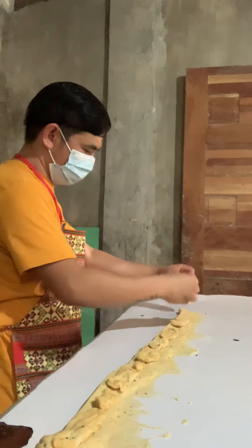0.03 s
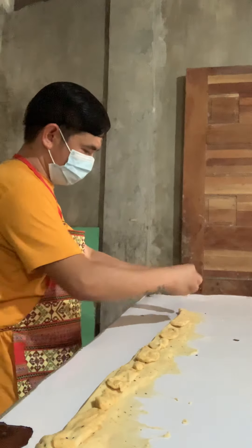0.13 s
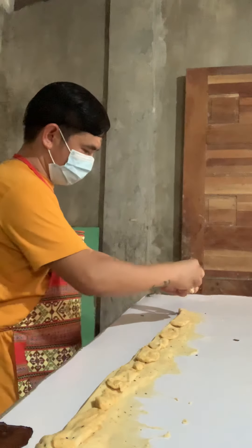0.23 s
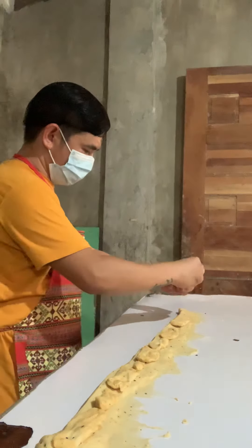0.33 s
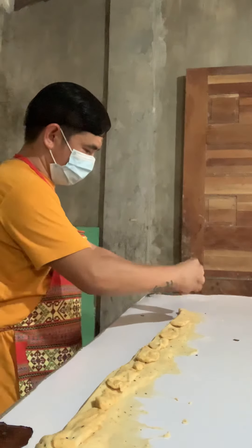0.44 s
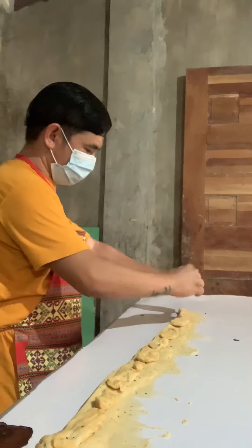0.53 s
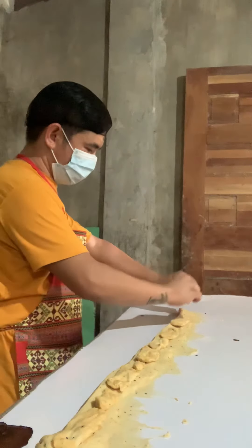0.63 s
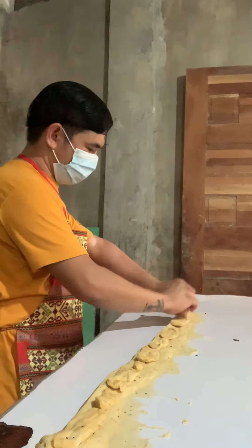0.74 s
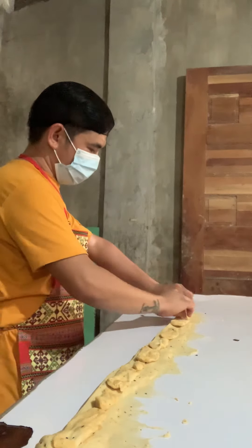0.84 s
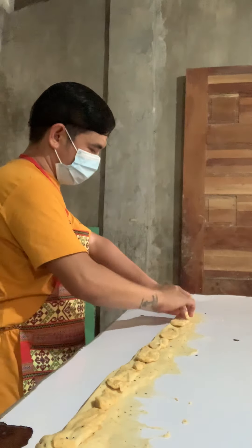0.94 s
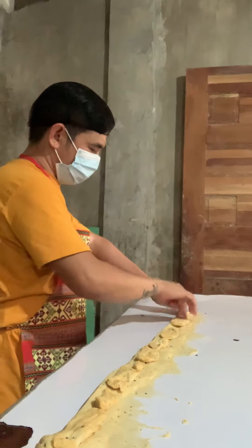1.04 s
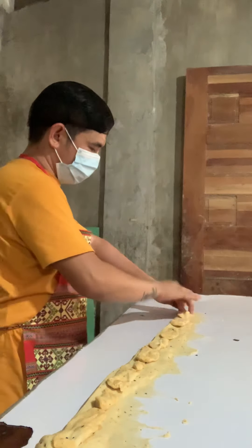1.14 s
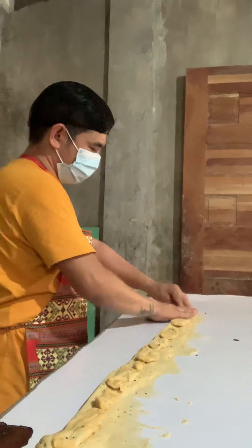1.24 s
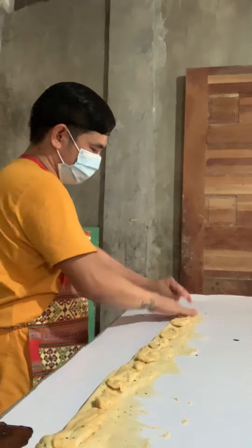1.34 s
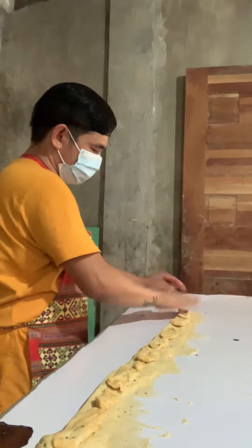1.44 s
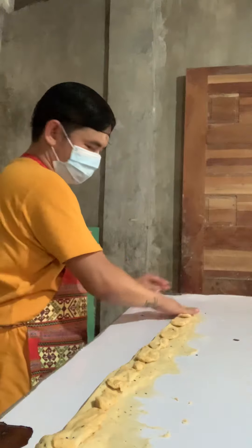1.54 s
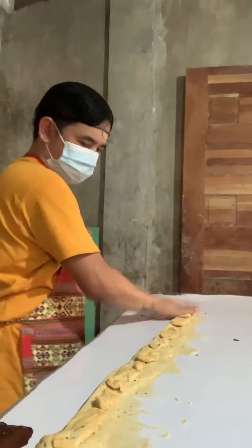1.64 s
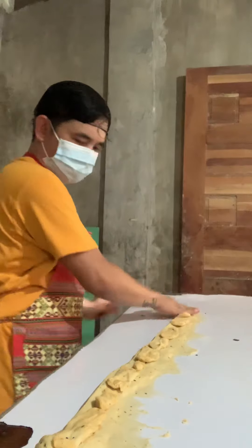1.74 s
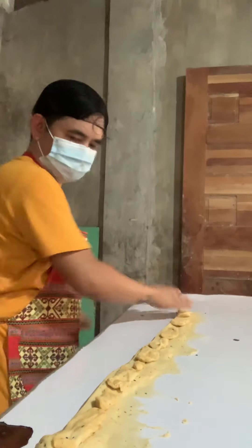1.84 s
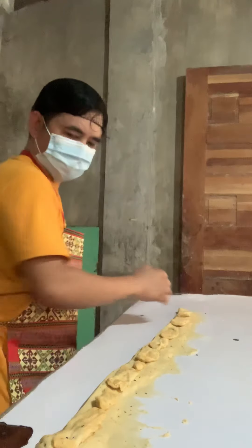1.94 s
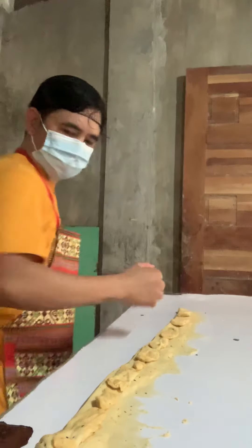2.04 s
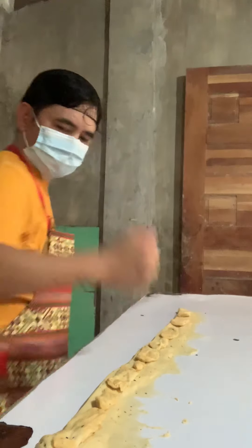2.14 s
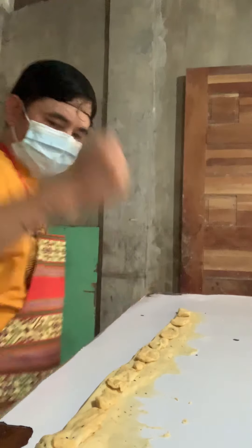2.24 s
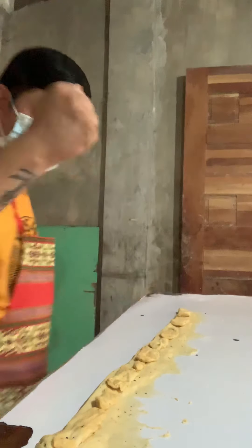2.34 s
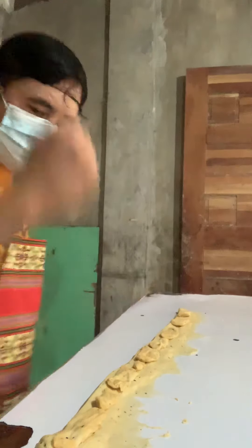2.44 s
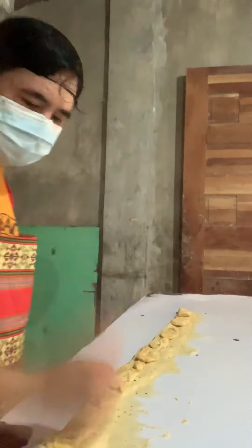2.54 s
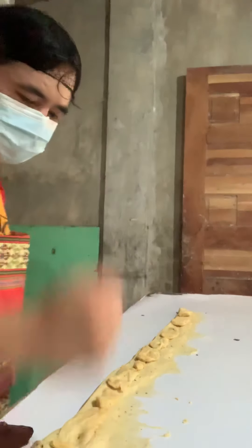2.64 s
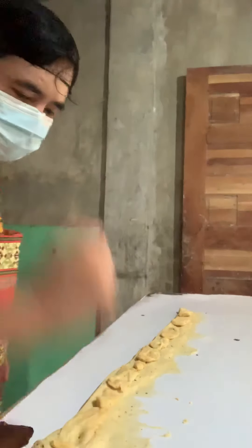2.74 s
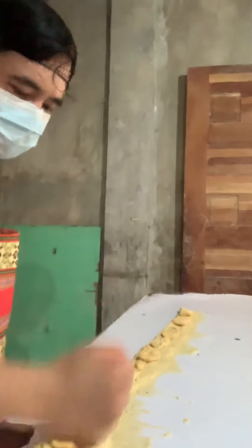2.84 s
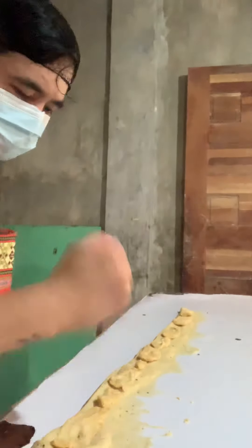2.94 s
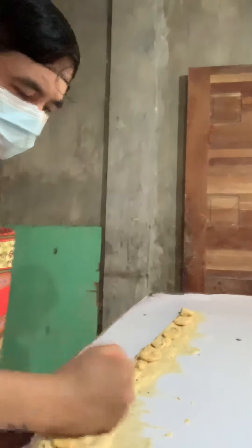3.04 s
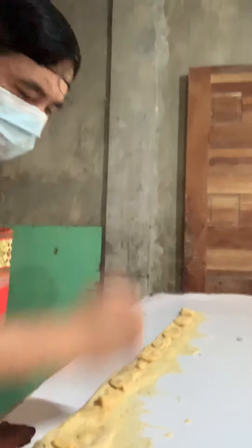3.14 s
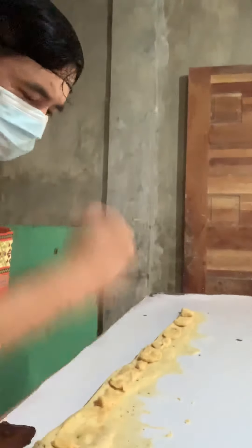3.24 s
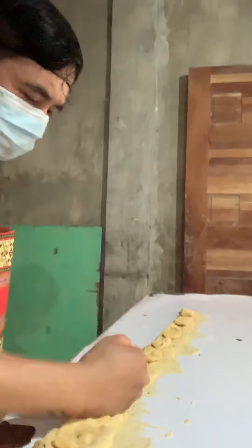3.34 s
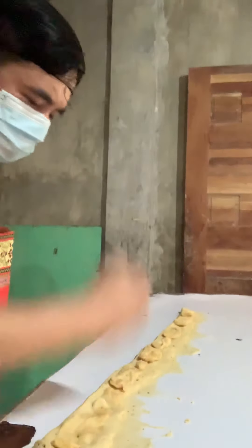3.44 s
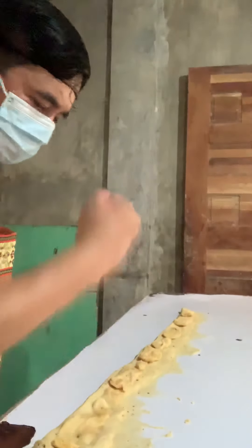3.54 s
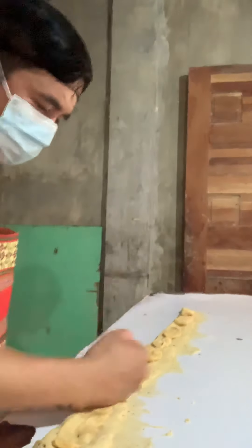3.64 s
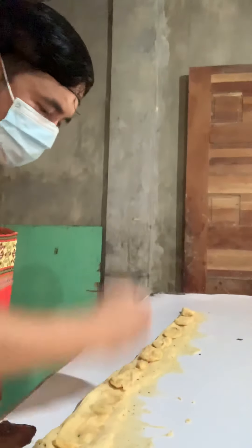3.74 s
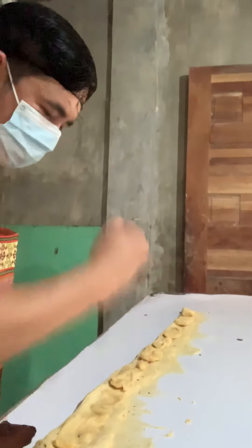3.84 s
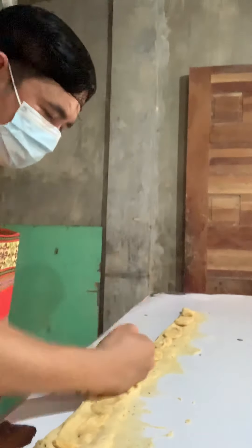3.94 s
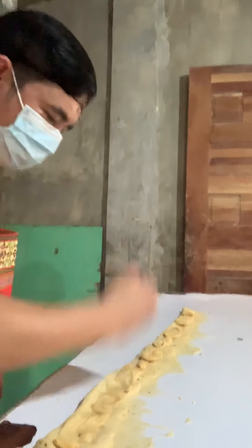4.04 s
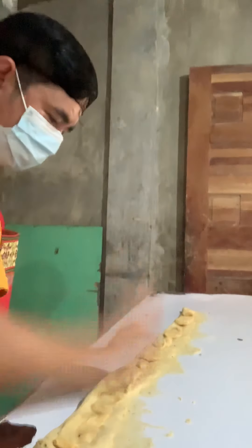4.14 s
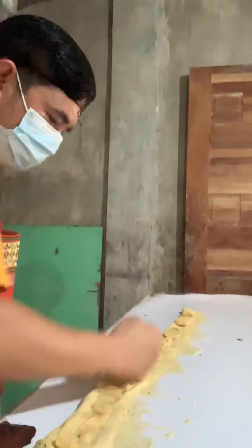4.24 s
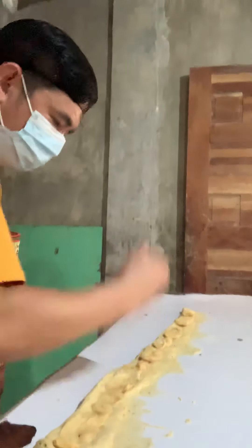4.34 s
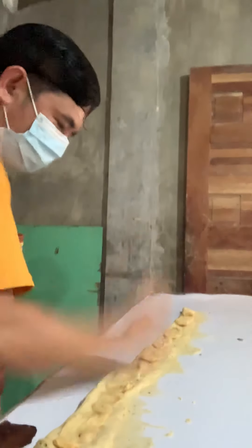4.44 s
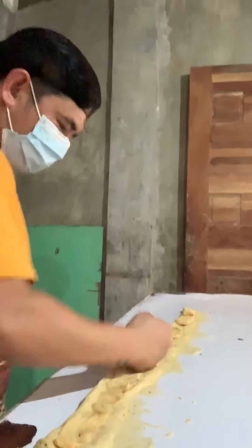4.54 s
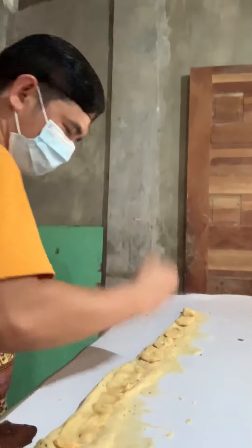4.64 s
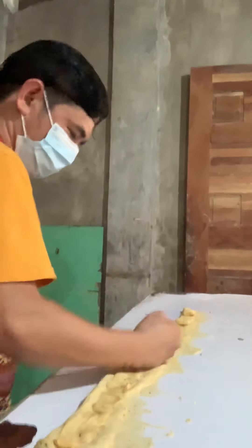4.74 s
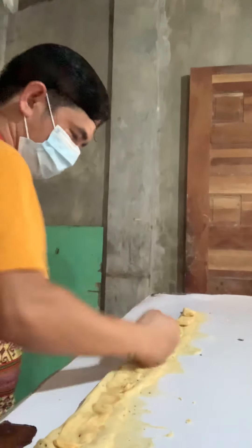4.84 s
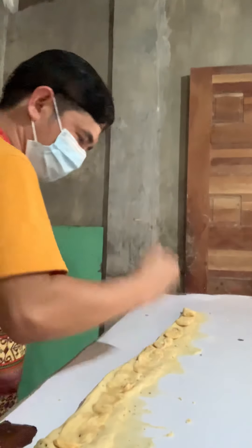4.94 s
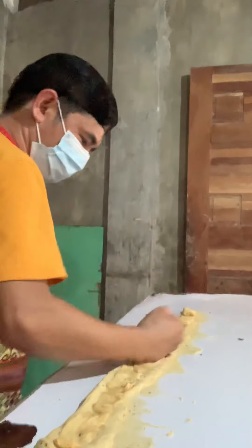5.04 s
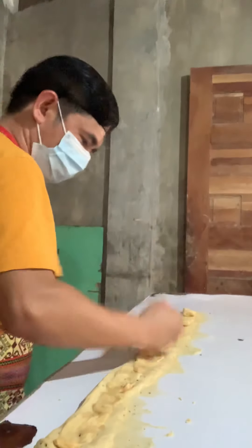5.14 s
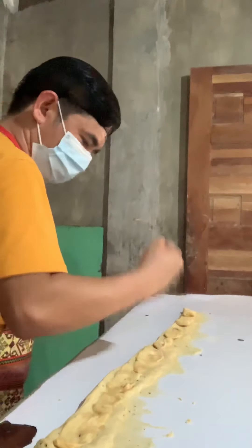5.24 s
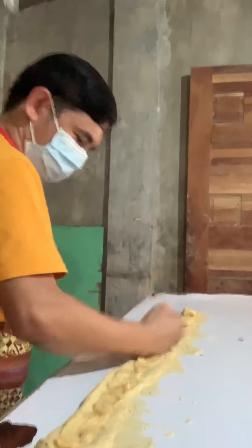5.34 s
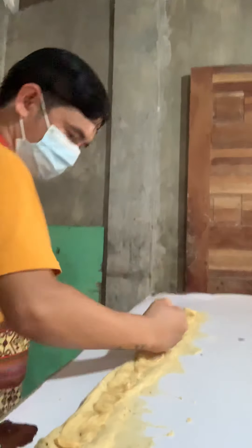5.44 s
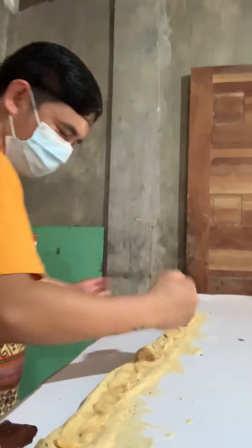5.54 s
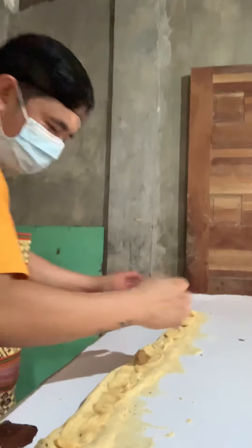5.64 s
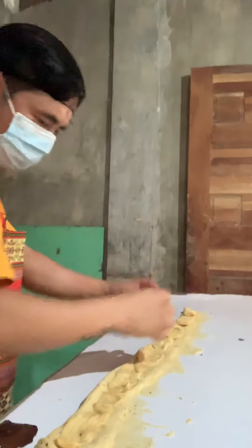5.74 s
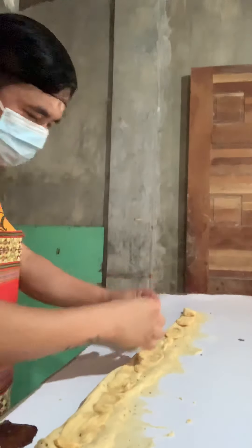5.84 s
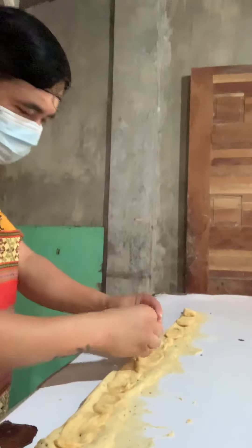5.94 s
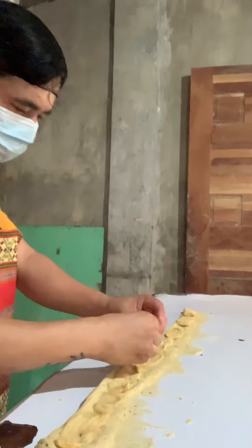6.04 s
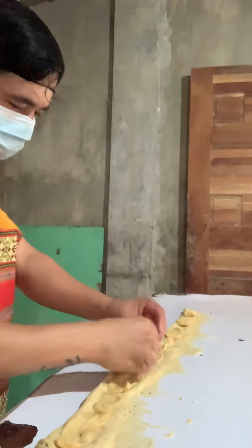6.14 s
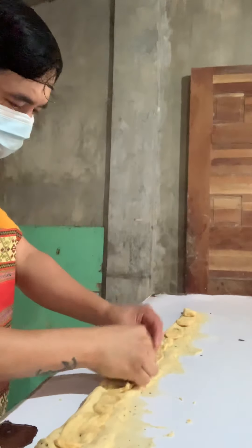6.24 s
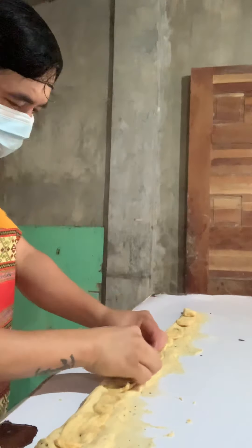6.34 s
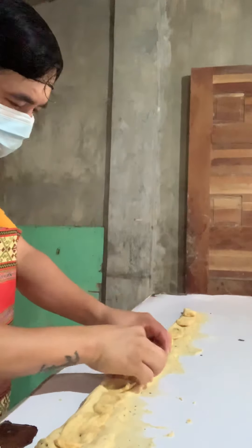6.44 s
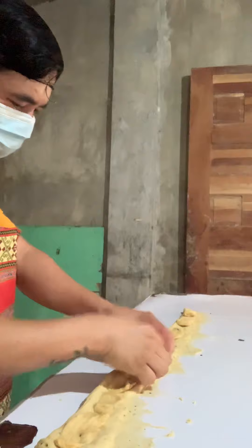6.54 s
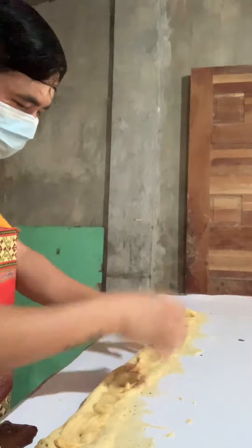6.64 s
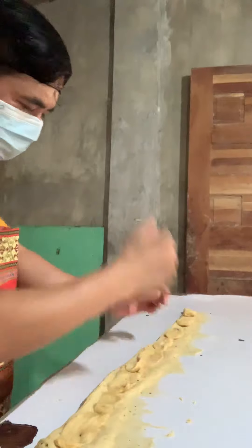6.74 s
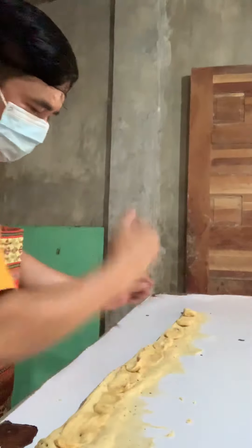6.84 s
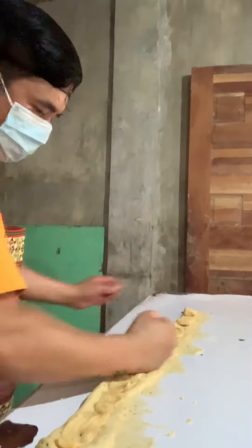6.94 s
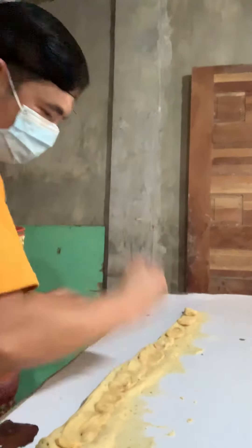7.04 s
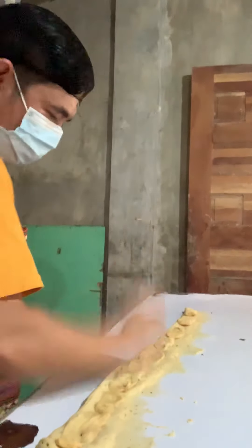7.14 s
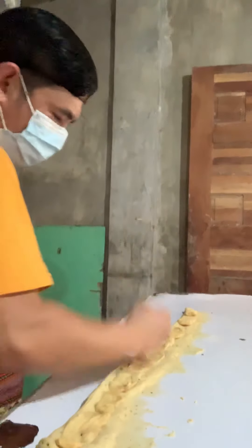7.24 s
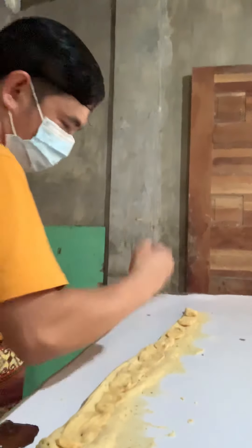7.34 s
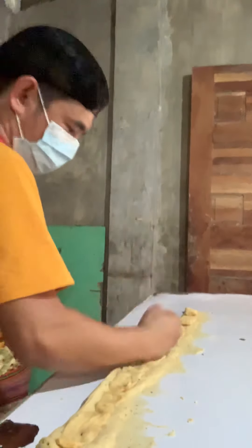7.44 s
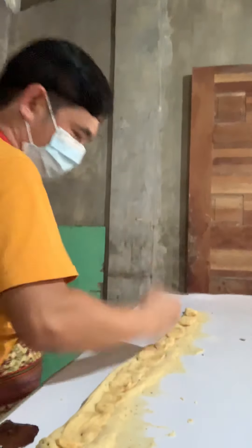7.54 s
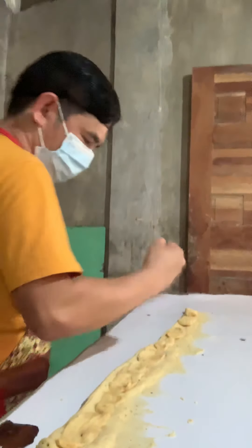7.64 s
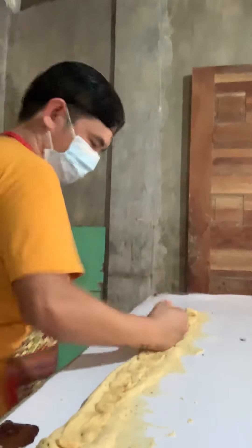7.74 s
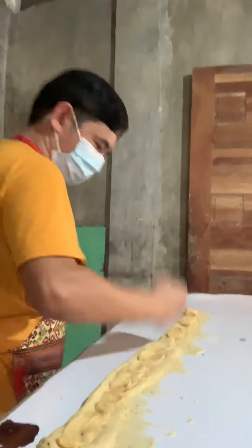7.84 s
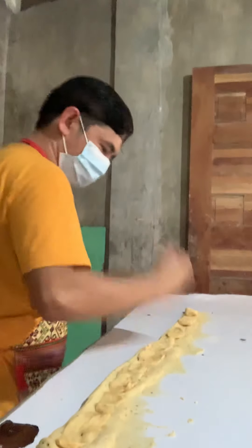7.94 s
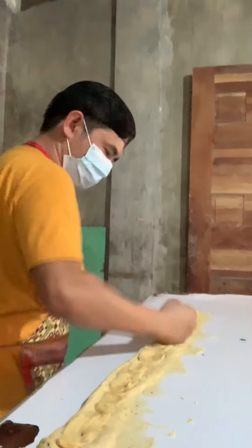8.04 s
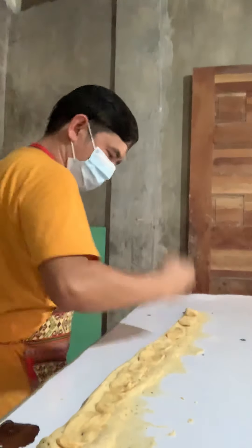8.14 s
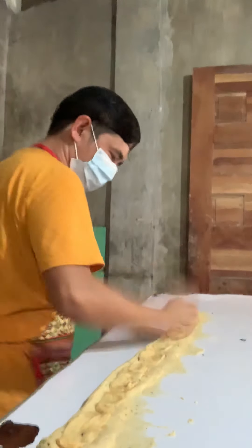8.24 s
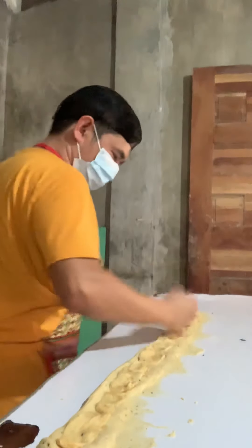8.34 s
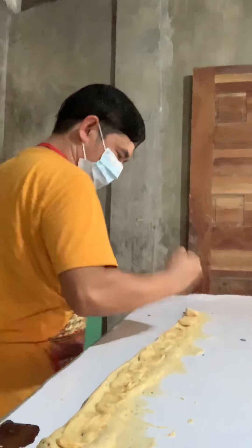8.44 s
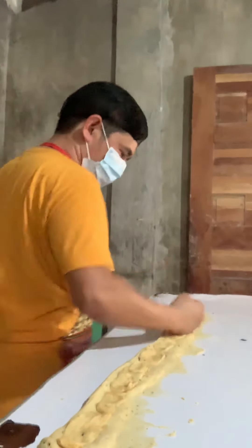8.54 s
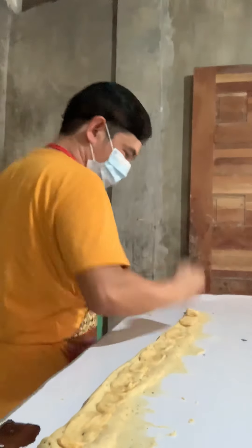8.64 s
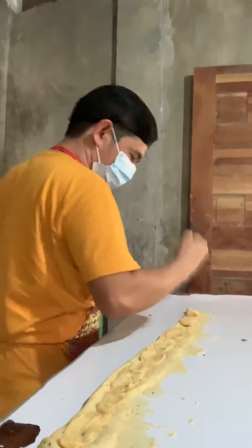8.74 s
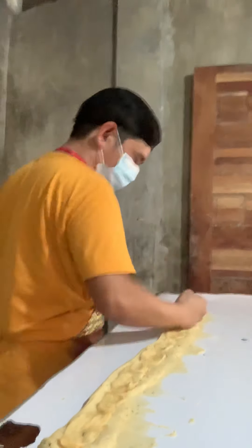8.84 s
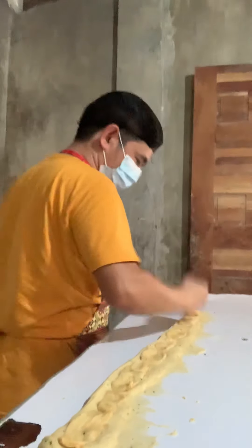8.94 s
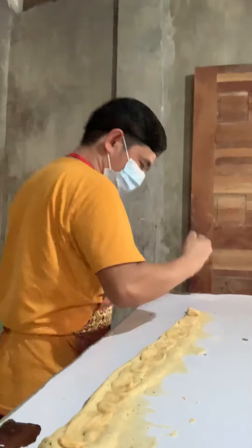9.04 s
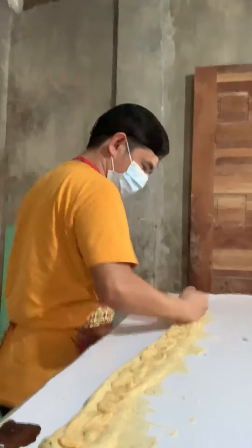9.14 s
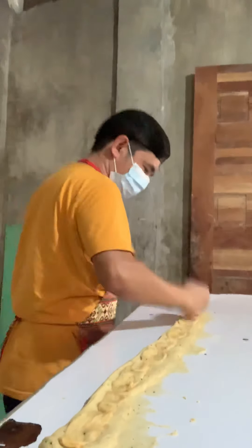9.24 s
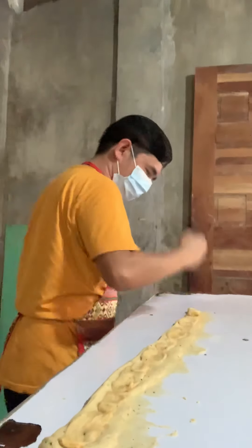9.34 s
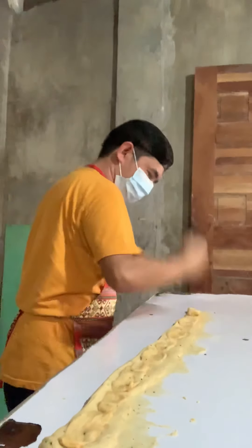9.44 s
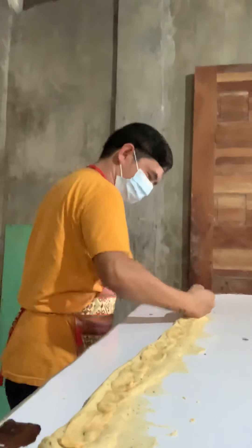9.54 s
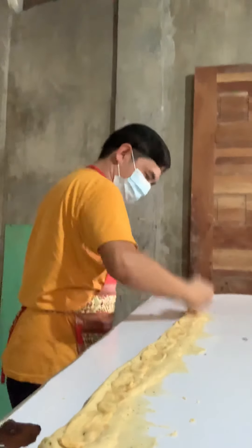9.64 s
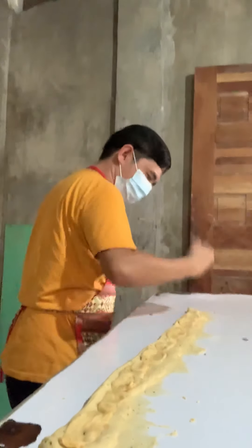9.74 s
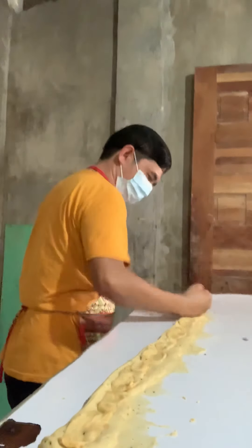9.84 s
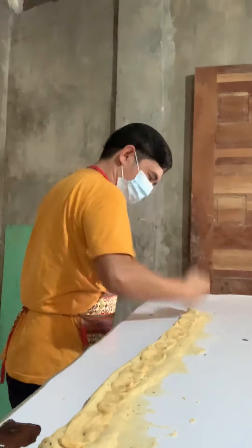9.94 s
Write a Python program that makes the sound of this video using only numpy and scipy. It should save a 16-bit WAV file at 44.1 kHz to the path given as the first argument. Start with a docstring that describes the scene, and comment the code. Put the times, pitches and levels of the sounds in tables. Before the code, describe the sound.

Close by, a fist pounds dough on a heavy table with a loose top. After a distant slap or two and soft palm pats, a run of about eleven deep thuds begins, each followed by a quick woody clack. It pauses with little but machine hum and faint pats, then a second run lasts to the end. Concrete-walled bakery, close stereo microphone.

```python
"""A fist pounds dough on a heavy table in two runs: modal booms, knocks and noise bursts per blow.
The loose top drops back and bounces; a palm pats the dough at softer moments.
Further off dough is slapped down: blurred noise, bench modes, a hollow pop, a skid and a hiss.
Behind: a motor of wavering harmonics and a rush of coloured noise, in a concrete-walled bakery."""
import sys
import numpy as np
from scipy import signal
from scipy.fft import rfft, irfft
from scipy.io import wavfile
from scipy.ndimage import uniform_filter1d, minimum_filter1d

SR = 44100
rng = np.random.default_rng(int(sys.argv[2]) if len(sys.argv) > 2 else 0)


def inscribe(sig):
    """Save sig as 16-bit PCM at rate SR to the path in sys.argv[1].

    A 1-D sig is mono; a 2-D sig holds one channel per row.
    Samples are clipped to [-1, 1] before scaling.
    """
    pcm = np.round(np.clip(np.atleast_2d(sig).T, -1, 1) * 32767)
    wavfile.write(sys.argv[1], SR, pcm.astype(np.int16))


N = 440559

# Event and source levels are relative: each source adds its own offset. Mode pitches are nominal.
# Spectra list hz, density_db (relative, per Hz).

# air rush spectrum: hz, density_db
AIR_SPECTRUM = [(25, -7), (46, -3.5), (68, -5.5), (100, -8), (160, -12.5), (250, -17.5), (380, -13.5),
                (620, -17.5), (1130, -15), (2500, -20.5), (6000, -29), (7500, -36), (10500, -41.5),
                (12500, -31), (16000, -38)]
# motor tones: multiple_of_speed, unloaded_rms_db, full_load_gain_db
MOTOR_TONES = [(2, -58, 13), (3, -57.5, -2.5), (4, -48.5, -15.5), (5, -54.5, -4.5), (6, -59.5, -8),
               (7, -58.5, -0.5), (10, -65, 1.5), (11, -58, -10), (12, -61, 0.5), (15, -57, -14),
               (16, -59.5, -9.5), (17, -57.5, -11), (21, -62, -8)]
# motor load breakpoints: time_s, load_0_to_1
MOTOR_LOAD = [(0, 0.26), (.36, 0.03), (.48, 0.73), (1.25, 0.9), (1.5, 0.22), (5.5, 0.7), (6.0, 1),
              (6.9, 0.66)]

# far slaps: start_s, body_db, pop_db, hiss_db, swell_s
FAR_SLAPS = [(0.645, -13, -18, -22, 0.0075), (1.895, -36, -39, -29, 0.018), (2.095, -14, -16.5, -23, 0.018),
             (2.178, -23.5, -25.5, -30.5, 0.011), (2.46, -34.5, -47, -30.5, 0.01),
             (2.731, -32, -49, -26.5, 0.047), (3.02, -31, -45, -29.5, 0.025),
             (3.299, -29.5, -44, -30, 0.05), (3.588, -30, -37, -31, 0.0056), (3.88, -26, -32, -28.5, 0.014),
             (4.185, -26, -49, -31, 0.053), (6.09, -36, -29, -33.5, 0.016),
             (6.36, -38.5, -37.5, -42, 0.027), (7.275, -18, -17.5, -37.5, 0.043),
             (7.57, -15.5, -19.5, -35, 0.072), (7.85, -17.5, -22, -37, 0.047),
             (8.08, -22, -23.5, -42, 0.075), (8.35, -14.5, -14, -29, 0.03),
             (8.645, -21.5, -20, -30.5, 0.018), (8.92, -23, -24, -28.5, 0.055),
             (9.259, -37, -36.5, -29, 0.056), (9.55, -35.5, -36, -28, 0.019)]
# slap body spectrum: hz, density_db
SLAP_BODY_SPECTRUM = [(30, -22.5), (55, -6), (80, 2), (130, -1), (200, -5.5), (400, -6), (650, -1.5),
                      (850, -5), (1080, -5.5), (1500, -9), (2500, -16.5), (5000, -33.5), (9000, -65)]
# floury hiss spectrum: hz, density_db
HISS_SPECTRUM = [(100, -22), (500, 10.5), (1500, 4.5), (3000, 3.5), (5800, 0), (8000, -10.5), (10500, -15),
                 (13000, -3), (16000, -10.5)]
# trapped-air spectrum: multiple_of_pop_pitch, density_db
POCKET_SPECTRUM = [(.25, -28), (.46, -7), (.66, -6.5), (.77, 1.5), (.89, -5.5), (1.02, 3), (1.16, -6),
                   (1.7, -10), (4, -59.5)]
# far bench modes: pitch_hz, level_db
BENCH_MODES = [(335, -5.5), (394, -3), (452, -5), (520, 0.5), (585, -0.5), (725, -4), (868, -11)]

# room decay: hz, t60_s
ROOM_DECAY = [(100, 0.89), (400, 0.85), (2000, 0.88), (6000, 0.82), (15000, 0.56)]
# spectrum of the wall tail: hz, density_db
WALL_SPECTRUM = [(60, -6.5), (150, -3.5), (400, 2.5), (850, -7), (1500, 6.5), (5000, 2), (15000, -11.5)]
# likeness of the two microphone ports: hz, likeness_0_to_1
PORT_LIKENESS = [(40, 1), (120, 1), (300, 0.88), (700, 0.62), (1400, 0.54), (3000, 0.13), (7000, 1),
                 (10000, 1), (14000, 0.11)]
# phase between the ports: hz, left_lead_rad
PORT_LEAD = [(30, 0), (150, 0), (800, -.5), (1400, -.8), (2200, -2.1), (4200, -4.2), (5700, -4.3),
             (7000, -3.3), (11000, -3.1), (12600, -1.7), (14800, -.2)]
# stereo width: hz, side_gain_db
SIDE_GAIN = [(30, -20), (80, 11), (150, 1.5), (300, 1), (700, 2), (2000, -0.5), (4000, -1.5), (7000, 1.5),
             (9500, 11), (12000, 2), (16000, -6.5)]

# palm pats: start_s, thump_db, knock_db
PALM_PATS = [(1.283, -26, -37.5), (1.321, -30, -38), (1.539, -16, -26), (1.722, -26, -38),
             (2.756, -35, -24), (5.777, -39, -45)]
# top under a flat palm: hz, density_db
PALM_SPECTRUM = [(60, 4), (200, -2.5), (400, -4), (700, -6), (1000, -16), (3000, -38), (9000, -62)]

# fist blows: start_s, thump_db, knock_db, smack_db, skin_lead_s, spot_hz, knock_tilt_db_per_octave, clap_db
FIST_BLOWS = [(2.618, -5.5, -9.5, -31, 0.014, 813, 1, -35), (2.862, -4, -10, -18.5, 0.015, 524, 2.5, -35),
              (3.089, -1, -6, -35, 0.013, 800, -0.5, -25.5), (3.368, -2, -6, -33, 0.013, 720, 1, -27),
              (3.683, -4, -9.5, -30, 0.015, 727, -0.5, -28), (3.969, -3.5, -11, -35, 0.016, 695, -2.5, -26),
              (4.225, -5, -9, -32, 0.014, 800, -1, -29), (4.527, -5, -11, -31, 0.014, 585, 1, -36),
              (4.802, -4.5, -7.5, -37, 0.014, 682, 0, -26.5), (5.069, -7, -11, -30.5, 0.014, 810, -2, -46),
              (5.369, -7, -10.5, -36, 0.011, 748, -1.5, -45),
              (6.943, -1.5, -3.5, -29, 0.014, 812, 0.5, -23.5),
              (7.193, -2.5, -6.5, -34, 0.012, 720, 0, -24), (7.473, -3.5, -6, -29, 0.014, 599, -1.5, -31),
              (7.748, -3, -9.5, -29.5, 0.017, 493, 1.5, -30),
              (8.024, -3.5, -8, -35, 0.011, 680, 0.5, -25.5), (8.289, -5.5, -8, -39, 0.015, 489, 0, -40),
              (8.533, -4.5, -8, -35, 0.0096, 598, 0.5, -31), (8.847, -4, -6, -30.5, 0.018, 900, -1.5, -24),
              (9.17, -5.5, -8.5, -31.5, 0.0098, 658, 0, -26), (9.53, -7, -6.5, -37, 0.015, 765, 0.5, -30),
              (9.875, -9.5, -8, -29, 0.019, 638, 1.5, -26)]
# loose top dropping on its frame: start_s, knock_db, click_db
TOP_DROPS = [(2.633, -14, -44), (2.645, -12, -33), (2.657, -22, -45), (2.677, -25.5, -51), (2.876, -7, -38),
             (2.889, -8, -36), (2.904, -21, -41), (3.107, -10.5, -33), (3.119, -6, -30), (3.132, -25, -46),
             (3.383, -13.5, -49), (3.397, -5.5, -25.5), (3.415, -23.5, -49), (3.697, -11.5, -37),
             (3.713, -6.5, -27), (3.723, -13.5, -39), (3.984, -13, -46), (3.997, -9.5, -34),
             (4.007, -24, -52), (4.235, -13.5, -44), (4.247, -8, -49), (4.538, -7.5, -38),
             (4.556, -12.5, -39), (4.814, -14, -44), (4.828, -9.5, -33.5), (5.091, -10, -43),
             (5.123, -17.5, -58), (5.386, -13.5, -37), (5.401, -19, -41), (6.954, -8.5, -36),
             (6.972, -8.5, -36), (7.0, -21, -39), (7.205, -9, -41), (7.22, -10.5, -45), (7.249, -15, -43),
             (7.497, -9.5, -35), (7.773, -8, -33), (8.051, -7.5, -31), (8.314, -13.5, -41),
             (8.556, -12.5, -31), (8.867, -12.5, -42), (8.881, -11.5, -36.5), (8.902, -21, -43),
             (9.194, -6.5, -34), (9.551, -6, -28), (9.896, -7.5, -25.5), (9.91, -12, -34)]
# table modes: pitch_hz, level_db, t60_s
TABLE_MODES = [(33.1, -15, 0.97), (48.3, -22, 0.3), (63.6, -9, 0.22), (85.3, -9.5, 0.21),
               (105.3, -21.5, 0.49), (121.3, -19.5, 0.73), (143, -23.5, 0.52), (175.4, -23.5, 0.47),
               (202, -35, 0.32), (232, -31.5, 0.6)]
# loose-top modes: pitch_hz, level_db
BOARD_MODES = [(205, -0.5), (272, -7), (338, -2.5), (386, -7.5), (484, -4), (553, 0.5), (618, -4.5),
               (660, 4), (745, -8.5), (778, 4), (836, 0.5), (895, -0.5), (1010, -4.5)]
# dull thud of top on frame: hz, density_db
THUD_SPECTRUM = [(60, -34), (150, 4), (250, 1.5), (430, -9.5), (520, 0.5), (660, -6), (810, -2.5),
                 (920, -4), (1080, -10.5), (1300, -24), (2200, -34.5), (5000, -40), (9000, -77),
                 (15000, -51)]
# frame shudder: hz, density_db
FRAME_SPECTRUM = [(40, -23), (100, 6), (170, 0.5), (240, 3), (300, 0), (370, -5), (480, -10.5),
                  (900, -32.5), (3000, -64)]
# hard-edge click: hz, density_db
CLICK_SPECTRUM = [(300, 6.5), (1900, -3.5), (3000, -1.5), (5500, -12.5), (7000, -1), (8500, -23),
                  (11000, -16), (13000, -10.5), (16000, -30)]
# skin on dough: hz, density_db
SMACK_SPECTRUM = [(200, 16.5), (1200, 1), (3000, 0), (5500, 2.5), (8000, -7), (11000, -5.5), (13000, -2.5),
                  (16000, -13)]
# dough spreading: hz, density_db
SQUELCH_SPECTRUM = [(300, -10), (1100, 6), (1900, 3), (2600, -9.5), (4000, 0.5), (6000, -28), (8000, -25),
                    (11000, -22), (13000, -20), (16000, -25)]
# air clapped from under the fist: hz, density_db
CLAP_SPECTRUM = [(300, -11), (900, 0), (1400, 3), (1950, 2), (2600, -8), (4000, -16), (8000, -40),
                 (16000, -42)]

AIR_DB, MOTOR_HZ = -41.5, 73.8
POP_HZ, POP_SAG_HZ_PER_S = 500, 10.4  # the pop's pitch sinks over the scene
PRESS_S, HISS_HOLD_S = 0.061, 0.0047  # swell plus hold of a slap, unless its swell is longer
SKID_HZ, SKID_FALL_OCT_PER_S, SKID_DB = 1840, 2.2, -22.5
USUAL_THUMP_DB = -5
SETTLE_DB, SETTLE_PER_DB = -19.5, 3.5  # second sinking grows as the thump softens
BOUNCE_MIN_S, BOUNCE_MAX_S, BOUNCE_DB = 0.012, 0.04, -11  # delay after a drop, level against it
EDGE_HZ = 16100


def amp(db):
    """Decibels to gain."""
    return 10 ** (np.asarray(db) / 20)


def evened(x):
    """Scales to rms 1."""
    return x / np.sqrt(np.mean(x ** 2) + 1e-20)


def read(points, hz):
    """Interpolates a table on a log-frequency axis."""
    f, value = np.transpose(points)
    return np.interp(np.log(hz + 1), np.log(f + 1), value)


def add(mix, start_s, sound):
    """Mixes a sound in at start_s."""
    part = mix[..., round(start_s * SR):][..., :sound.shape[-1]]
    part += sound[..., :part.shape[-1]]


def swell_decay(t, rise_s, t60_s):
    """Linear rise, then exponential decay."""
    return np.minimum(t / rise_s, 1) * amp(-60 * np.maximum(t - rise_s, 0) / t60_s)


def noise(spectrum, size, spread=1):
    """Coloured rms-1 noise at the two ports; lower spread makes them more alike."""
    hz = np.fft.rfftfreq(size, 1 / SR)
    a, b, c, d = rng.standard_normal((4, len(hz)))
    same = np.clip(1 - spread * (1 - read(PORT_LIKENESS, hz)), 0, 1)
    left = a + 1j * b
    right = same * left + np.sqrt(1 - same ** 2) * (c + 1j * d)
    right = right * np.exp(-1j * read(PORT_LEAD, hz))
    return evened(irfft(np.array([left, right]) * amp(read(spectrum, hz)), size))


def burst(spectrum, rise_s, t60_s, size, spread=1):
    """Noise as a dense resonance cluster that swells and dies, at a fixed energy."""
    shape = swell_decay(np.arange(size) / SR, rise_s, t60_s)
    return evened(noise(spectrum, size, spread) * shape) * np.sqrt(np.mean(shape ** 2))


def ragged(sound, grain_db, grain_samples, smooth_samples=1):
    """Random gain per grain breaks up a sound; its overall level is kept."""
    steps = np.repeat(rng.standard_normal(sound.shape[1] // grain_samples), grain_samples)
    grains = amp(grain_db * uniform_filter1d(steps, smooth_samples))
    return evened(sound * grains) * np.std(sound)


def blur(spectrum, rise_s, hold_s=0):
    """Noise that swells, holds, then dies at the room's rate in each band."""
    hz, age_s, z = signal.stft(noise(spectrum, size=SR), SR, nperseg=256)
    fade = amp(-60 * np.maximum(age_s - hold_s, 0) / read(ROOM_DECAY, hz)[:, None])
    tail = signal.istft(z * fade, SR, nperseg=256)[1]
    return tail * np.minimum(np.arange(tail.shape[1]) / SR / rise_s, 1)


def machinery(waver_hz=0.14, swell_db=1.5, flutter_db=1.5):
    """Wavering air rush plus motor harmonics whose balance follows the load."""
    t = np.arange(N) / SR

    def wander(count):
        return np.interp(t, np.linspace(0, t[-1], count), rng.standard_normal(count))

    load = np.interp(t, *np.transpose(MOTOR_LOAD))
    turns = np.cumsum(MOTOR_HZ + waver_hz * wander(40)) / SR
    out = amp(AIR_DB + flutter_db * wander(70)) * noise(AIR_SPECTRUM, size=N)
    for multiple, db, loaded_db in MOTOR_TONES:
        level = amp(db + loaded_db * load + swell_db * wander(14))
        out += level * np.sqrt(2) * np.sin(2 * np.pi * (round(multiple) * turns + rng.random()))
    return out


def room(x):
    """Concrete walls: three noise tails, fed from the left port, trade shares cyclically in time."""
    t = np.arange(N) / SR
    out = np.zeros((2, N))
    for k in range(3):
        tail = blur(WALL_SPECTRUM, rise_s=0.0059)
        tail = tail / np.linalg.norm(tail[0])
        share = np.cos(np.pi * (0.9004 * t + k / 3)) * np.sqrt(2 / 3)
        out += signal.fftconvolve((x[0] * share)[None], tail, axes=1)[:, :N]
    return out


def skid(swell_s, width_hz=700, t60_s=1.0, grain_db=4):
    """Dough drags over flour: uneven slips ring in a band that sinks as the lump slows."""
    t = np.arange(SR // 2) / SR
    steps = np.repeat(rng.standard_normal(len(t) // 128 + 1), 128)[:len(t)]
    slips = rng.standard_normal((2, len(t))) * amp(grain_db * steps)
    r = np.exp(-np.pi * width_hz / SR)
    band = signal.lfilter([1], np.poly([r, r]), slips)
    pitch_hz = SKID_HZ * 2 ** (-SKID_FALL_OCT_PER_S * t)
    scrape = band * np.cos(2 * np.pi * np.cumsum(pitch_hz) / SR)
    return evened(scrape) * swell_decay(t, swell_s, t60_s)


def bench(swell_s, t60_s=0.91, scatter_db=4, loading=0.0143):
    """The far bench's modes, randomly detuned and weighted, build up and ring out."""
    t = np.arange(SR) / SR
    ring = np.zeros((2, SR))
    for hz, db in BENCH_MODES:
        level = amp(db + scatter_db * rng.standard_normal())
        turns = hz * (1 + loading * rng.standard_normal()) * t + rng.random()
        ring += level * np.sin(2 * np.pi * turns + .5 * rng.standard_normal((2, 1)))
    return evened(ring) * swell_decay(t, swell_s, t60_s)


def far_slaps(lump_db=2.44):
    """Dough slapped down: uneven body, bench ring, trapped-air pop, skid and floury hiss."""
    out = np.zeros((2, N))
    for s, body_db, pop_db, hiss_db, swell_s in FAR_SLAPS:
        pop_hz = POP_HZ - POP_SAG_HZ_PER_S * s
        hold_s = max(PRESS_S - swell_s, 0)
        pocket = [(pop_hz * multiple, db) for multiple, db in POCKET_SPECTRUM]
        body = blur(SLAP_BODY_SPECTRUM, swell_s, hold_s)
        # random gain points every 600 samples
        lumps = np.interp(np.arange(body.shape[1]) / 600, np.arange(100), rng.standard_normal(100))
        add(out, s, amp(body_db - 3.5 + lump_db * lumps) * body)
        add(out, s, amp(body_db - 14.0) * bench(swell_s + 0.0086))
        add(out, s, amp(pop_db) * blur(pocket, swell_s * 2.9, hold_s + swell_s))
        add(out, s, amp(body_db + SKID_DB) * skid(swell_s + 0.0091))
        hiss = blur(HISS_SPECTRUM, swell_s * 0.59 + 0.0068, HISS_HOLD_S)
        add(out, s - .005, amp(hiss_db) * hiss)
    return out


def pat(db, palm_hz=110, t60_s=0.14, sway_db=-15, sway_t60_s=0.35):
    """A soft palm stirs mostly low table modes and damps them; the legs sway on."""
    t = np.arange(SR // 2) / SR - .02
    ring = np.zeros(len(t))
    for hz, level_db, _ in TABLE_MODES[1:]:
        ring += amp(level_db) / (1 + (hz / palm_hz) ** 8) * np.cos(2 * np.pi * hz * t)
    contact = .5 + .5 * np.tanh((t - .003) / 0.0087)
    sway = amp(sway_db - 60 * t / sway_t60_s) * np.sin(2 * np.pi * TABLE_MODES[0][0] * t)
    return amp(db) * contact * (sway - amp(12.0 - 60 * t / t60_s) * ring)


def patting():
    """Palm pats: a damped low ring and a dull murmur of the top, at the two ports."""
    out = np.zeros((2, N))
    for s, thump_db, knock_db in PALM_PATS:
        add(out, s - .02, pat(thump_db))
        murmur = burst(PALM_SPECTRUM, rise_s=0.014, t60_s=0.12, size=8192, spread=0.49)
        add(out, s - .012, amp(knock_db) * murmur)
    return out


def smack(db, grain_db=6, spray_db=-13):
    """Skin meets dough: one hard snap, then a spray of tiny pops."""
    snap = burst(SMACK_SPECTRUM, rise_s=.0005, t60_s=.004, size=4096, spread=.4)
    spray = burst(SMACK_SPECTRUM, rise_s=.0018, t60_s=.014, size=4096)
    return amp(db + 17.5) * (snap + amp(spray_db) * ragged(spray, grain_db, 16))


def click(db, t60_s=0.034, grain_db=5):
    """Hard edges meet: a short, ragged crack."""
    crack = burst(CLICK_SPECTRUM, rise_s=.001, t60_s=t60_s, size=4096)
    return amp(db) * ragged(crack, grain_db, 32)


def squelch(db, rise_s=0.0041, t60_s=0.25, grain_db=8.5):
    """Dough spreads under the fist: clumped crackle of small bubbles dies away."""
    crackle = burst(SQUELCH_SPECTRUM, rise_s, t60_s, size=8192, spread=0.42)
    return amp(db) * ragged(crackle, grain_db, 64, smooth_samples=32)


def thump(s, db, settle_db, push_hz=72, push_db=2.0, settle_s=0.0198, settle_hz=55,
          scatter_db=2.5, ring_db=-1, loading=0.069, sway_loading=.02):
    """Fist pushes the top down, it sinks once more, then rings, retuned by the arm's weight."""
    lead_s = .02
    t = np.arange(SR) / SR - lead_s
    u = (np.pi * push_hz * t) ** 2
    v = (np.pi * settle_hz * (t - settle_s)) ** 2
    push = amp(db + push_db) * (2 * u - 1) * np.exp(-u)
    settle = amp(settle_db) * (2 * v - 1) * np.exp(-v)
    contact = .5 + .5 * np.tanh(t / 0.0077)
    ring = np.zeros(SR)
    for k, (hz, level_db, t60_s) in enumerate(TABLE_MODES):
        place, weight = rng.standard_normal(2)  # each spot favours other modes
        hz = hz * (1 + (loading if k else sway_loading) * weight)
        ring += amp(level_db + scatter_db * place - 60 * t / t60_s) * np.sin(2 * np.pi * hz * t)
    return s - lead_s, push + settle + amp(db + ring_db) * contact * ring


def knock(s, db, spot_hz, tilt_db, rise_s, frame_db, note_db=-5.0, note_t60_s=0.035, thud_db=-2.5,
          under_db=-8, under_ratio=0.597, boards_db=-9.0, boards_t60_s=0.14, detune=0.097,
          scatter_db=3, loading=0.0403, pivot_hz=520):
    """Top strikes frame: thud, brief notes of the spot and a lower mode, frame shudder, board ring."""
    t = np.arange(8192) / SR

    def tilted(table):
        return [(hz, db + tilt_db * np.clip(np.log2(hz / pivot_hz), -1, 1)) for hz, db in table]

    note_hz = spot_hz * (1 + detune * rng.uniform(-1.26, 1))
    under_hz = spot_hz * under_ratio * rng.uniform(0.832, 1.156)
    note = np.sin(2 * np.pi * note_hz * t)
    note += amp(under_db - note_db) * np.sin(2 * np.pi * under_hz * t)
    note *= np.sqrt(2) * swell_decay(t, rise_s, note_t60_s)
    ports = np.array([np.roll(note, 6), note])  # left is 6 samples late

    ring = np.zeros((2, len(t)))
    for hz, level_db in tilted(BOARD_MODES):
        turns = hz * (1 + loading * rng.standard_normal()) * t + rng.random()
        level = amp(level_db + scatter_db * rng.standard_normal())
        ring += level * np.sin(2 * np.pi * turns + .5 * rng.standard_normal((2, 1)))
    boards = evened(ring) * swell_decay(t, rise_s, boards_t60_s)

    thud = burst(tilted(THUD_SPECTRUM), rise_s, t60_s=.04, size=8192, spread=.3)
    frame = amp(frame_db - tilt_db) * burst(FRAME_SPECTRUM, rise_s=0.0059, t60_s=.11, size=8192)
    mix = amp(thud_db) * thud + frame + amp(note_db) * ports + amp(boards_db) * boards
    return s - rise_s, amp(db) * mix


def pounding():
    """Fist blows, then the top drops and bounces; returns mono boom and two-port contact sound."""
    boom, contact = np.zeros(N), np.zeros((2, N))
    for s, thump_db, knock_db, smack_db, lead_s, spot_hz, tilt_db, clap_db in FIST_BLOWS:
        settle_db = SETTLE_DB - SETTLE_PER_DB * (thump_db - USUAL_THUMP_DB)
        add(boom, *thump(s, thump_db, settle_db))
        add(contact, *knock(s + 0.00099, knock_db - .3, spot_hz, tilt_db, rise_s=.009, frame_db=-9))
        add(contact, s - .002, click(knock_db - 12.0, t60_s=0.013))
        add(contact, s + .008, squelch(.5 * knock_db - 29.0))
        # skin lands just before the weight; air squeezes out
        touch_s = s - lead_s
        add(contact, touch_s - .0005, smack(smack_db))
        clap = burst(CLAP_SPECTRUM, rise_s=0.0066, t60_s=0.074, size=4096, spread=0.63)
        add(contact, touch_s - .002, amp(clap_db) * clap)
        brush = burst(SMACK_SPECTRUM, rise_s=0.017, t60_s=0.074, size=4096)
        add(contact, touch_s - .01, amp(.5 * smack_db - 19.5) * brush)
        hiss = burst(HISS_SPECTRUM, rise_s=0.011, t60_s=0.37, size=16384)
        add(contact, touch_s - .004, amp(-33.0) * hiss)
    for s, knock_db, click_db in TOP_DROPS:
        nearest = min(FIST_BLOWS, key=lambda blow: abs(blow[0] - s))
        spot_hz, tilt_db = nearest[5:7]
        add(contact, *knock(s + 0.001014, knock_db - .3, spot_hz, tilt_db, rise_s=0.002233, frame_db=-10))
        add(contact, s - .0005, click(click_db + 8))
        bounce_s = s + rng.uniform(BOUNCE_MIN_S, BOUNCE_MAX_S)
        add(contact, *knock(bounce_s, knock_db + BOUNCE_DB, spot_hz, tilt_db, rise_s=0.002004, frame_db=-5))
    return boom, contact


def scene():
    """Near table direct and through the walls, far slaps as blurred sound, machinery behind."""
    boom, contact = pounding()
    pats = patting()
    walls = room(amp(-7) * boom + amp(-11.0) * contact + amp(-10.5) * pats)
    return boom + contact + pats + walls + far_slaps() + machinery()


def record(dry):
    """Frequency-dependent stereo width, a fast peak limiter, then a low-pass."""
    mid = dry.mean(0)
    side = irfft(rfft(dry[0] - mid) * amp(read(SIDE_GAIN, np.fft.rfftfreq(N, 1 / SR))), N)
    pair = np.array([mid + side, mid - side])
    ceiling = .97
    allowed = ceiling / np.maximum(abs(pair).max(0), ceiling)
    held = pair * uniform_filter1d(minimum_filter1d(allowed, size=221), size=221)
    lowpass = signal.firwin(511, EDGE_HZ, window=("kaiser", 9), fs=SR)
    return signal.oaconvolve(held, lowpass[None], "same")


dry = scene()
out = record(dry)
inscribe(out)
```